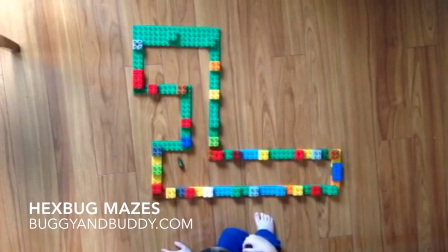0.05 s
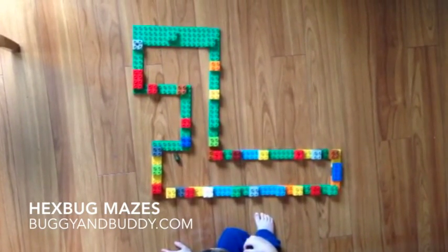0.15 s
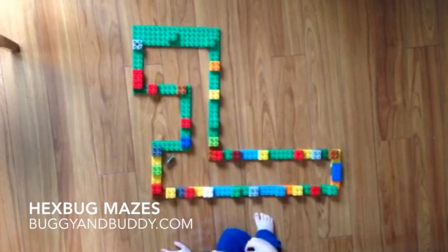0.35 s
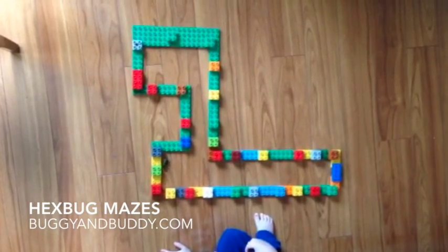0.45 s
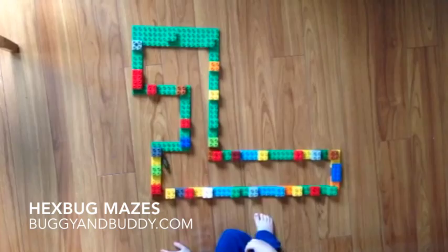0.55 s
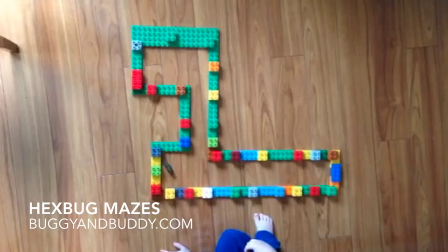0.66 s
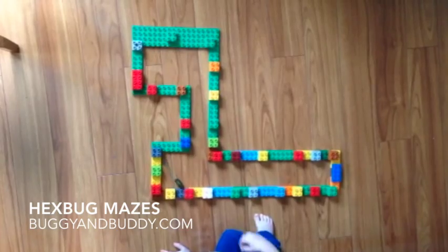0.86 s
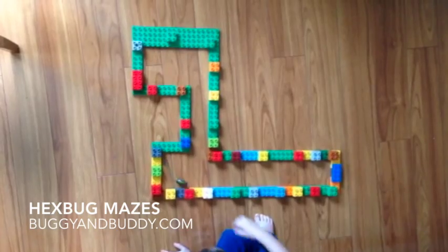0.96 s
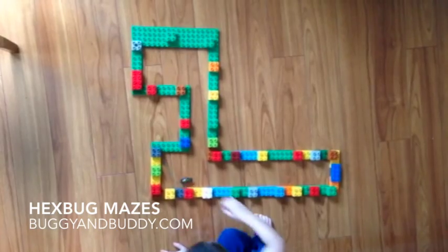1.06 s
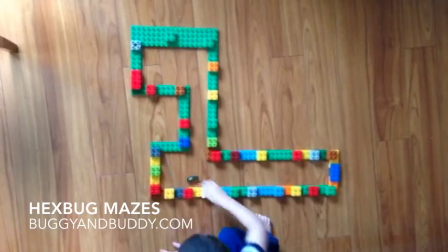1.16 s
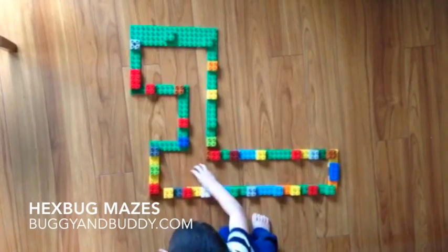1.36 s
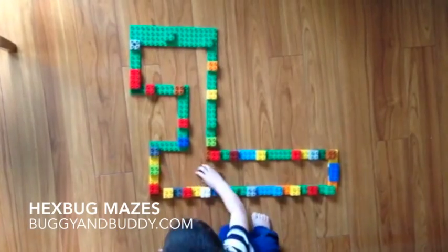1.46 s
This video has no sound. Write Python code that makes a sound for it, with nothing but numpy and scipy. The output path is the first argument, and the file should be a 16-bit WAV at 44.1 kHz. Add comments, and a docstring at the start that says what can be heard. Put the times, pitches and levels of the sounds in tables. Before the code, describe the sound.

A vibrating toy bug patters across a wooden floor, knocking against plastic bricks.

```python
"""From the start a room rumbles and hums, while a vibrating toy bug hisses along on its bristles
and hops on a wooden floor, thudding softly in the boards. At 0.2 s it meets a maze of plastic bricks:
a hollow piece knocks several times, then scrapes briefly just after 0.5 s. A second piece clacks
sharply at 0.9 s and more faintly near 1.5 s. The room rings briefly after each blow."""
import sys
import numpy as np
from scipy import signal
from scipy.fft import rfft, irfft
from scipy.io import wavfile
from scipy.ndimage import uniform_filter1d

SR = 44100
rng = np.random.default_rng(int(sys.argv[2]) if len(sys.argv) > 2 else 0)


def unload_audio(sound):
    """Save the sound as a 16-bit wav file, at the path given as the first command line argument."""
    columns = np.transpose(np.atleast_2d(sound))
    # keep every value between -1 and 1, then stretch to whole-number steps
    steps = np.round(np.clip(columns, -1, 1) * 32767)
    wavfile.write(sys.argv[1], SR, steps.astype(np.int16))


N = 66150

# tone of the steady background noise: f/Hz, level/dB
RUMBLE_TONE = [(25, -27), (50, -7.5), (80, -4), (115, 0.5), (190, 0), (280, 0.5), (600, -5.5), (1000, -16),
               (2000, -18), (4000, -16), (6500, -17.5), (10000, -18.5), (15000, -22.5)]
# low notes of the room's hum: f/Hz, level/dB
HUM_NOTES = [(120, -75.5), (166, -75.5), (192, -75)]
# peaks in the hiss of the bristles: f/Hz, width/Hz, base level/dB
HISS_PEAKS = [(4350, 600, -79.5), (6700, 690, -79.5), (7850, 630, -72.5)]
# how that hiss swells and dips: t/s, added level/dB
HISS_SWELL = [(0, 2.5), (.18, 2), (.3, -2), (.5, -7), (.62, 2), (.9, -1), (1.13, 1.5), (1.3, 1.5),
              (1.4, -8), (1.5, 8)]
# the bug's clear landings: t/s, level/dB added to HOP_DB, f/Hz
LANDINGS = [(0.026, -6, 547), (0.0605, -3.5, 600), (0.068, -8.5, 560), (0.087, -14.5, 520),
            (0.106, -5, 605), (0.157, -24, 168), (0.175, -5, 510), (0.215, -3.5, 554), (0.292, 7, 505),
            (0.351, 2.5, 470), (0.555, 2, 590), (0.575, -2, 560), (0.621, -2, 487), (0.678, -4.5, 430),
            (0.738, 2, 500), (0.825, -5, 524), (0.863, -7, 483), (0.921, 7.5, 595), (0.9735, 6.5, 526),
            (1.055, -4.5, 605), (1.102, -8.5, 415), (1.161, -7.5, 407), (1.223, -6, 410),
            (1.264, -3.5, 577), (1.344, -6, 543), (1.379, -4, 580), (1.431, -4.5, 474), (1.479, -0.5, 560)]
# notes the floorboards ring at: f/Hz, level/dB, t60/s (the time to fade by 60 dB)
BOARD_NOTES = [(324, -27, 0.26), (454.5, 6, 0.31), (509, -5.5, 0.26), (567, -19.5, 0.18),
               (610.4, -4.5, 0.39), (698, 9.5, 0.3)]
# length of the room's echo tail: f/Hz, t60/s (zero or less means no tail)
ECHO_DECAY = [(150, -0.4), (600, 0.15), (1400, 0.76), (2800, 0.67), (5500, 0.4), (9000, 1.26), (15000, 6)]
# tone of the room's echoes: f/Hz, level/dB
ECHO_TONE = [(150, -13.5), (600, -3), (1400, -1), (2800, -3), (5500, -4), (9000, -5), (15000, -13)]
# blows on the hollow piece: t/s, level/dB, treble boost/(dB per octave), bass boost/(dB per octave)
KNOCK_BLOWS = [(0.2146, -29, -5, 9.5), (0.2160, -27.5, 8.5, -4), (0.2454, -4.5, -1.5, -4.5),
               (0.2470, -3.5, -6, 1), (0.2665, -14, -0.5, 6), (0.2908, -0.5, 2.5, 0),
               (0.2955, -3.5, 0.5, -1), (0.534, -28, 0, 6.5), (0.591, -48, -8, 12)]
# notes the hollow piece rings at: f/Hz, level/dB, t60/s
KNOCK_NOTES = [(1112, -9, 0.048), (1322, -12, 0.053), (1487, -10, 0.082), (1955, -13.5, 0.059),
               (2717, -5.5, 0.035), (2785, 3, 0.036), (2982, -0.5, 0.03), (3515, -10, 0.045),
               (4370, -8, 0.047), (5070, -11.5, 0.038), (6460, -10, 0.048)]
# tone of the crack as it is hit: f/Hz, level/dB
KNOCK_TONE = [(40, -40), (150, -26), (350, -17), (550, 0.5), (780, 0), (1400, 2), (2250, 1), (3000, 0.5),
              (6300, -3.5), (8200, -16), (11500, -19.5), (15500, -31)]
# blows on the second piece: t/s, level/dB, treble boost/(dB per octave), bass boost/(dB per octave)
CLACK_BLOWS = [(0.9148, -3, 4, -4.5), (0.9162, -3, 1.5, 0.5), (0.9205, -6, -1, 5), (1.4792, -19, 4, 8.5),
               (1.4838, -23, 6.5, -0.5)]
# notes the second piece rings at: f/Hz, level/dB, t60/s
CLACK_NOTES = [(596, -2, 0.07), (1160, -0.5, 0.083), (1463, -0.5, 0.066), (2220, -1, 0.018),
               (2640, -2, 0.028), (2796, 11, 0.034), (3200, -16, .03), (3794, 3, 0.078), (4700, -18, .03),
               (4974, 0.5, 0.074), (5740, -1, 0.038), (6500, -16, 0.034)]
# tone of the crack as it is hit: f/Hz, level/dB
CLACK_TONE = [(40, -37), (150, -14.5), (350, -11), (620, 1.5), (870, -9.5), (1200, 0.5), (1850, -4.5),
              (2700, 4), (6000, 0), (7600, -11), (11000, -16), (15500, -27)]

HOP_DB, HOP_RISE_S, BOARD_DB = -45.5, 0.001, 2.5
PATTER_PER_S, PATTER_DB, PATTER_HZ = 58, -75.5, 508
PATTER_SCATTER_DB, PATTER_SPREAD_OCTAVES = 7.5, 0.36
ROOM_BUILD_S, EARLY_DB, EARLY_T60_S = 0.011, 13.5, 0.2
CEILING_DELAY_S, CEILING_DB, CEILING_T60_S = 0.015, -4, 0.1
CRACK_DB, CRACK_RISE_S, PLASTIC_ECHO_DB, RING_IN_ROOM_DB = -10.5, 0.0005, 2, -7

TIME = np.arange(N) / SR  # seconds since the start
AGE = np.arange(SR // 2) / SR  # seconds since a blow


def undb(db):
    """Turn decibels into a number to multiply by."""
    return 10 ** (np.asarray(db) / 20)


def level(x, db):
    """Set a sound's average (rms) level."""
    return x * undb(db) / np.sqrt(np.mean(x ** 2))


def unit(x):
    """Scale a sound so that its energy is 1."""
    return x / np.sqrt(np.sum(x ** 2))


def fade(t60):
    """A curve that falls by 60 dB in t60 seconds."""
    return np.exp(-np.log(1000) * AGE / max(t60, 1e-3))


def bins(size=N):
    """The frequency of each point in a spectrum."""
    return np.maximum(np.arange(size // 2 + 1) * SR / size, 1)


def lookup(points, hz):
    """Read between the rows of a frequency table, spacing octaves evenly."""
    freqs, values = np.array(points, float).T
    return np.interp(np.log(hz), np.log(freqs), values)


def colour(db):
    """A filter with the given dB at each frequency, which never sounds ahead of its input."""
    cepstrum = irfft(np.log(undb(db)))
    cepstrum[1:len(cepstrum) // 2] *= 2
    cepstrum[len(cepstrum) // 2 + 1:] = 0
    return np.exp(rfft(cepstrum))


def through(x, response):
    """Let every sample of a sound set off a ring or an echo."""
    return signal.fftconvolve(x, response)[:N]


def at(x, start_s):
    """Start a sound at a given time."""
    return np.pad(x, (max(int(start_s * SR), 0), N))[:N]


def wander(per_s):
    """A random drift of roughly 1 either way."""
    step = int(SR / per_s)
    held = np.repeat(rng.standard_normal(N // step + 1), step)
    return uniform_filter1d(held, step)[:N]


def ring(notes):
    """A struck object rings at several notes, each fading at its own pace."""
    return unit(sum(undb(db) * fade(t60) * np.sin(2 * np.pi * hz * AGE) for hz, db, t60 in notes))


def background(rumble_db=-65):
    """The room's low rumble, faint hiss and wavering hum."""
    rumble = irfft(rfft(rng.standard_normal(N)) * undb(lookup(RUMBLE_TONE, bins())), N)
    hum = np.zeros(N)
    for hz, db in HUM_NOTES:
        note = np.sin(2 * np.pi * hz * TIME + wander(5.01))
        hum += level(note * undb(2 * wander(7.2)), db)
    return level(rumble, rumble_db) + hum


def bristles(flicker_db=2):
    """Bristles scuff the floor: a thin, flickering hiss around three high pitches."""
    hiss = np.zeros(N)
    for hz, width, db in HISS_PEAKS:
        peak = 1 / (1 + (2 * (bins() - hz) / width) ** 2)
        hiss += level(irfft(rfft(rng.standard_normal(N)) * peak, N), db)
    swell_db = np.interp(TIME, *np.array(HISS_SWELL).T)
    return hiss * undb(swell_db + flicker_db * wander(40.44))


def thud(hz):
    """One soft landing: a few cycles that swell and die."""
    t = np.arange(SR // 20) / SR
    return t / HOP_RISE_S * np.exp(1 - t / HOP_RISE_S) * np.sin(2 * np.pi * hz * t)


def hops():
    """The bug's clear hops and the light random patter between them make the boards ring."""
    clear = sum(at(undb(HOP_DB + db) * thud(hz), start_s) for start_s, db, hz in LANDINGS)
    patter = np.zeros(N)
    for when, size, pitch in rng.random((int(PATTER_PER_S * N / SR), 3)):
        hz = PATTER_HZ * 2 ** (PATTER_SPREAD_OCTAVES * (2 * pitch - 1))
        strength = undb(PATTER_SCATTER_DB * (2 * size - 1))
        patter += at(strength * thud(hz), when * N / SR)
    feet = clear + level(patter, PATTER_DB)
    boards = ring(BOARD_NOTES)
    boards /= np.abs(rfft(boards)).max()
    return feet + undb(BOARD_DB) * through(feet, boards)


def echoes(count):
    """The room's answer at `count` spots: early echoes, a ceiling bounce, a tail longest in the treble."""
    noise = rfft(rng.standard_normal(N))
    octaves_hz = 125 * 2. ** np.arange(8)
    early = undb(EARLY_DB) * fade(EARLY_T60_S)
    build_up = 1 - np.exp(-AGE / ROOM_BUILD_S)
    ceiling = undb(CEILING_DB) * at(fade(CEILING_T60_S), CEILING_DELAY_S)[:len(AGE)]
    tails = np.zeros((count, len(AGE)))
    for hz, share in zip(octaves_hz, np.eye(len(octaves_hz))):
        band = irfft(noise * np.interp(np.log(bins()), np.log(octaves_hz), share), N)
        shape = (fade(lookup(ECHO_DECAY, hz)) + early) * build_up + ceiling
        # each spot starts at a different point in the noise
        spots = np.array([np.roll(band, k * N // count)[:len(AGE)] for k in range(count)])
        tails += undb(lookup(ECHO_TONE, hz)) * unit(shape) * spots
    return tails


def room(x):
    """The room adds its echoes to a sound."""
    return x + through(x, echoes(1)[0])


def shell(notes, cut_hz=1090):
    """A plastic piece rings, but is too small to give off much bass."""
    bass_cut = signal.butter(2, cut_hz, "high", fs=SR, output="sos")
    return unit(signal.sosfilt(bass_cut, ring(notes)))


def plastic(blows, notes, crack_tone, ring_db, crack_t60):
    """Each blow makes a noisy crack and rings the piece; the room echoes both."""
    hz = bins(len(AGE))
    body = undb(ring_db) * rfft(shell(notes))
    crack = undb(CRACK_DB) * rfft(unit(irfft(colour(lookup(crack_tone, hz)))))
    crack_shape = fade(crack_t60) * (1 - np.exp(-AGE / CRACK_RISE_S))
    combined = np.hypot(undb(RING_IN_ROOM_DB) * np.abs(body), np.abs(crack))
    into_room = undb(PLASTIC_ECHO_DB) * colour(20 * np.log10(combined))
    treble_octaves = np.log2(np.clip(hz, 3000, 16000) / 3000)
    bass_octaves = np.log2(2500 / np.clip(hz, 400, 2500))
    sound = np.zeros(N)
    for (start_s, db, treble, bass), tail in zip(blows, echoes(len(blows))):
        grit = rfft(unit(rng.standard_normal(len(AGE)) * crack_shape))
        blow = body + crack * grit + into_room * rfft(tail)
        tone = colour(db + treble * treble_octaves + bass * bass_octaves)
        sound += at(irfft(blow * tone), start_s)
    return sound


def scrape(start_s=0.531, length_s=0.036, db=-60, catches_per_s=2500, ring_db=-7.5):
    """The hollow piece drags briefly: a run of tiny catches makes it crackle and ring."""
    progress = np.clip((TIME - start_s) / length_s, 0, 1)
    swell = np.sqrt(progress * (1 - progress))
    catches = (rng.random(N) < catches_per_s / SR) * rng.standard_normal(N) * swell
    crack = unit(irfft(colour(lookup(KNOCK_TONE, bins(len(AGE))))))
    one_catch = crack + undb(ring_db) * shell(KNOCK_NOTES)
    return undb(db) * unit(through(catches, one_catch)) * np.sqrt(length_s * SR)


def scene():
    """The bug and the two plastic pieces in the room, in one channel."""
    knocks = plastic(KNOCK_BLOWS, KNOCK_NOTES, KNOCK_TONE, ring_db=-7, crack_t60=0.037)
    clacks = plastic(CLACK_BLOWS, CLACK_NOTES, CLACK_TONE, ring_db=-14, crack_t60=0.035)
    return (knocks + clacks + room(scrape() + hops()) + bristles() + background())[None]


def record(dry):
    """Cut away the very highest treble."""
    top_hz = 15400
    return signal.sosfilt(signal.ellip(10, .2, 70, top_hz, fs=SR, output="sos"), dry)


dry = scene()
out = record(dry)
unload_audio(out)
```